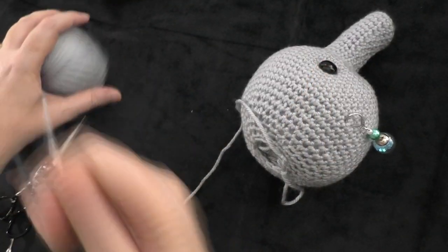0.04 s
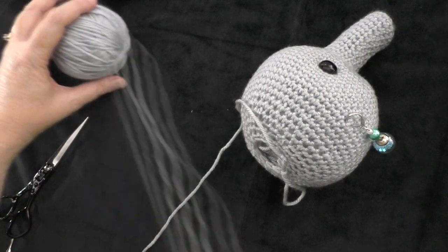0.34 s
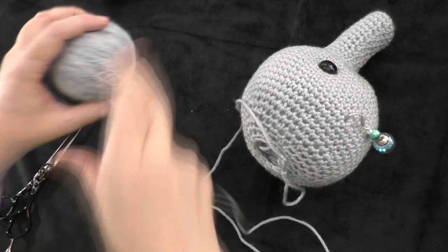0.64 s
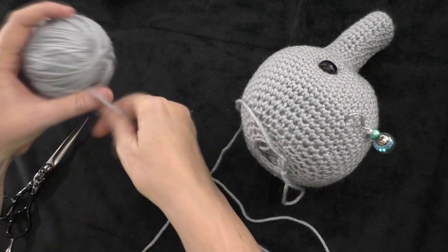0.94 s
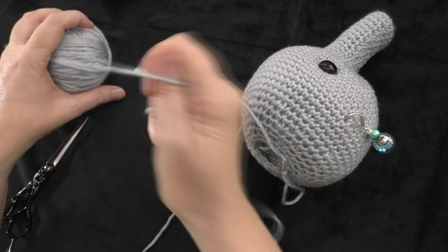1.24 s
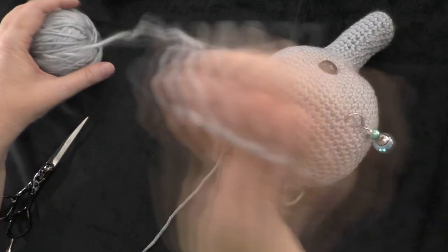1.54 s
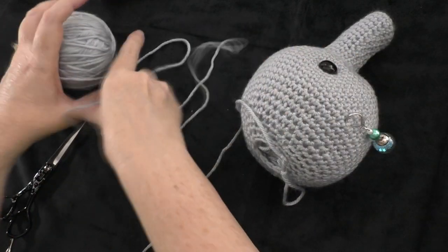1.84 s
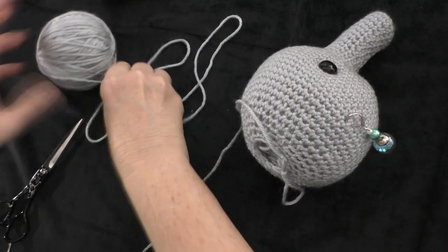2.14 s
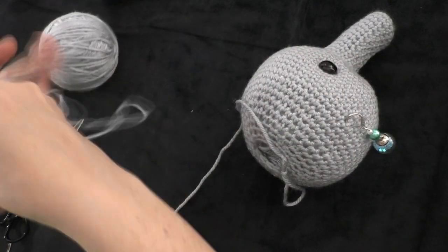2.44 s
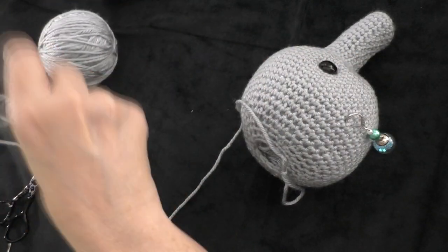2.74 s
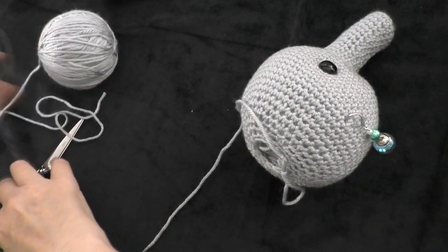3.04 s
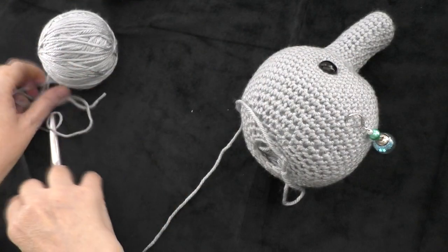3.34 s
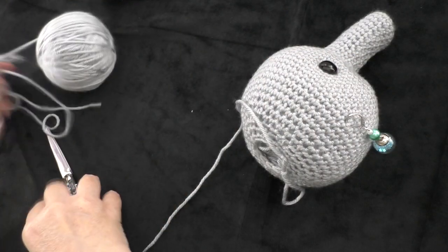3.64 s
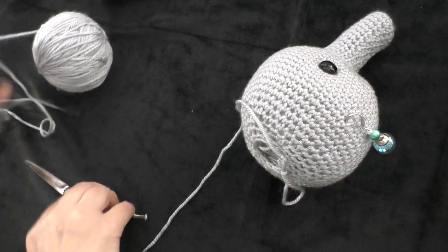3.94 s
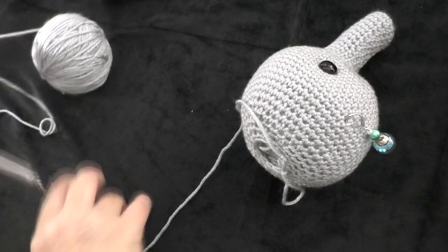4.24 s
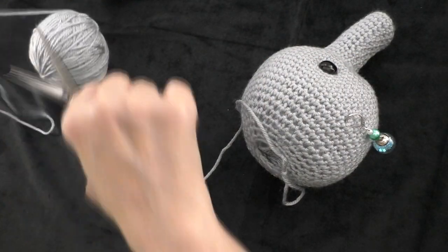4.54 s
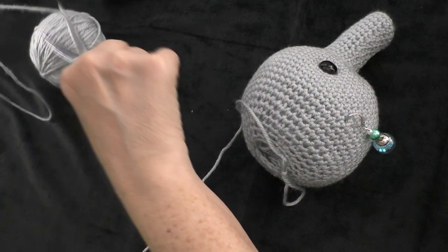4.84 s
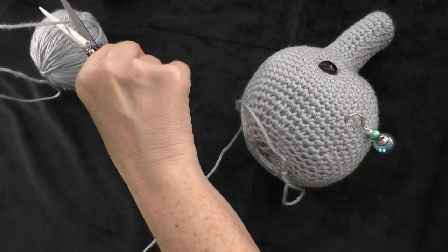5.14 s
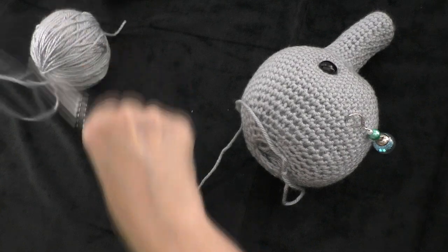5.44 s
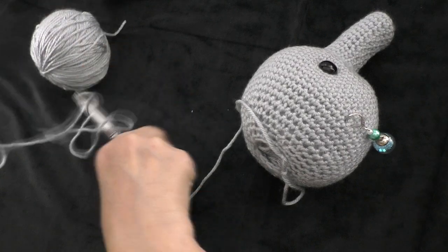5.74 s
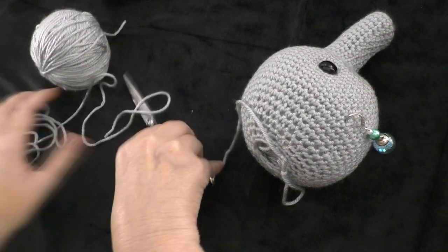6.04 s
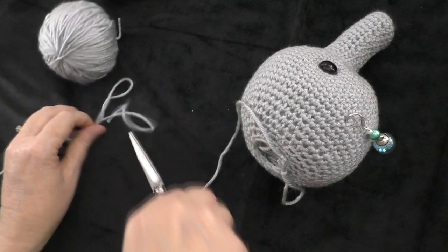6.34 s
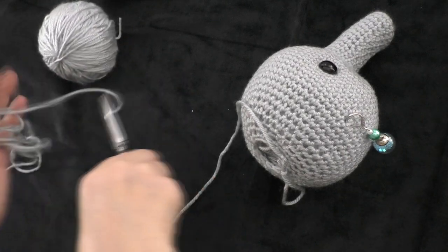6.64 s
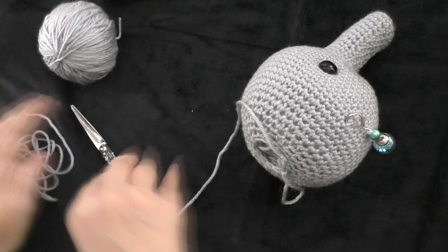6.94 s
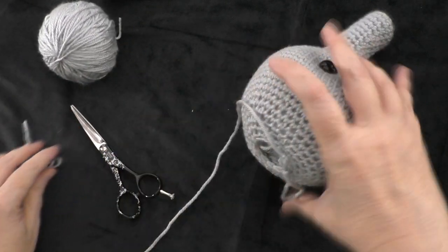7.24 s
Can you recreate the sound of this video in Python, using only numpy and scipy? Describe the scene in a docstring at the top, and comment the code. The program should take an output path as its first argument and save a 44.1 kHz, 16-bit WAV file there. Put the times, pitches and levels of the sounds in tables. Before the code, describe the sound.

Right at the start, steel scissors knock on a cloth-covered table with a dull thump, the strongest of the table knocks. Yarn rubs softly off a ball until about 1.5 seconds. Hands brush the cloth throughout and bump the table near 1.9 seconds. At 3.4 seconds the scissors give a sharp click with a soft thud, then light clinks and a short scrape up to 3.9. They snip lightly at 4.5 seconds and more sharply at 5.3. Another knock comes at 6 seconds. Around 6.9 the scissors clatter down with a low table rumble, then scrape faintly at 7.3. Underneath runs a faint low hum with thin hiss and an appliance buzz, which dips from about 4.5 to 6.2 seconds. The room is small and fairly dry, the stereo microphone close, with table and scissors slightly left.

```python
"""Yarn is pulled and cut at a cloth-covered table in a small, humming room, close to a stereo microphone.
First steel scissors knock on the table top and yarn rubs off the ball; hands bump, brush and lean.
From about 3 s the scissors are in the hand: they clink, then snip near 4.5 s and 5.3 s, while the
raised hand shields the microphone from an appliance buzzing behind. Near 7 s they clatter down on
the table and scrape briefly over the cloth."""
import sys
import numpy as np
from scipy import signal
from scipy.fft import rfft, irfft, next_fast_len
from scipy.io import wavfile
from scipy.ndimage import map_coordinates

SR = 44100
rng = np.random.default_rng(int(sys.argv[2]) if len(sys.argv) > 2 else 0)


def generate_wav(sig):
    """Save sig (samples, or channels by samples) to the path in sys.argv[1] as 16-bit PCM at SR."""
    pcm = np.round(np.clip(np.atleast_2d(sig).T, -1, 1) * 32767).astype(np.int16)
    wavfile.write(sys.argv[1], SR, pcm)


N = 326781


def amp(db):
    """Decibels to gain."""
    return 10 ** (np.asarray(db) / 20)


def unit(x):
    """x at rms 1."""
    return x / np.sqrt(np.mean(x ** 2) + 1e-20)


def along(points, hz):
    """(Hz, value) points read on a log axis."""
    freqs, values = np.transpose(points)
    return np.interp(np.log(hz + 1), np.log(freqs + 1), values)


def clock(size):
    """Seconds for size samples."""
    return np.arange(size) / SR


def wobble(rate):
    """A smooth random curve, rate knots a second."""
    return map_coordinates(rng.standard_normal(int(N * rate / SR) + 4), [clock(N) * rate])


def swell(s, length):
    """A smooth rise and fall around s seconds."""
    return np.exp(-2 * ((clock(N) - s) / length) ** 2)


def filtered(x, response):
    """x times a response of frequency."""
    size = x.shape[-1]
    padded = next_fast_len(size + SR // 4)
    return irfft(rfft(x, padded) * response(np.fft.rfftfreq(padded, 1 / SR)), padded)[..., :size]


def noise(spectrum, size=N):
    """Coloured noise of rms 1."""
    return unit(filtered(rng.standard_normal(size), lambda hz: amp(along(spectrum, hz))))


def add(track, s, sound):
    """Lay a sound into the track at s seconds."""
    part = track[max(round(s * SR), 0):][:len(sound)]
    part += sound[:len(part)]


def ring(modes, detune, blur):
    """Damped modes of peak 1; each blow shifts them a little, and loose contact blurs their phase."""
    t, x = clock(SR // 3), 0
    for hz, db, t60 in modes:
        strength_db = db + rng.standard_normal()
        wander = np.cumsum(rng.standard_normal(len(t))) / np.sqrt(SR)
        shifted_hz = hz * (1 + detune * rng.standard_normal())
        x = x + amp(strength_db - 60 * t / t60) * np.sin(2 * np.pi * shifted_hz * t + blur * wander)
    return x / np.abs(x).max()


# The two sides of the microphone. Each row: frequency in Hz, left-right likeness from 0 to 1.
STEREO_LIKENESS = [(60, 0.29), (150, 0.48), (380, 0.88), (950, 0.69), (2380, 0.29), (5980, 0.68),
                   (15000, 0.44)]
def diffuse(spectrum):
    """Stereo noise of rms 1 that reaches the microphone from all around."""
    angle = lambda hz: np.arccos(np.clip(along(STEREO_LIKENESS, hz), -1, 1)) / 2
    mid = filtered(noise(spectrum), lambda hz: np.cos(angle(hz)))
    side = filtered(noise(spectrum), lambda hz: np.sin(angle(hz)))
    return unit(np.array([mid + side, mid - side]))


def steady_tones(lines, drift_rad=.2):
    """Steady tones whose phases barely wander."""
    x = 0
    for hz, db in lines:
        phase = 2 * np.pi * (hz * clock(N) + rng.random())
        x = x + amp(db) * np.sqrt(2) * np.sin(phase + drift_rad * wobble(3.14))
    return x


# Still air all around the microphone. Each row: frequency in Hz, relative density in dB.
AIR_SPECTRUM = [(22, -21), (55, -7), (95, -5), (150, -6.5), (270, -3), (350, -12.5), (490, -12),
                (600, -26.5), (790, -26), (1150, -16.5), (2400, -24.5), (4000, -29.5), (7000, -45.5),
                (15000, -29)]
# Low room drone, dead centre: a mains hum near 120 Hz with faint steady room resonances.
# Each row: frequency in Hz, rms level in dB.
DRONE_LINES = [(119.7, -59.5), (179.5, -71), (275, -70), (599.5, -83)]
def room_tone(air_db=-57):
    """Air and a low drone fill the small room throughout."""
    return amp(air_db) * diffuse(AIR_SPECTRUM) + steady_tones(DRONE_LINES)


# The buzz behind the table. Each row: frequency in Hz, rms level in dB before the hand's shadow.
BUZZ_LINES = [(1168, -80.5), (1828.3, -82), (1888.2, -85), (1948.1, -76.5), (2008, -84), (2367.5, -84)]
# The whir around it. Each row: frequency in Hz, relative density in dB.
WHIR_SPECTRUM = [(400, 10), (750, 5), (1150, 4.5), (1550, 0.5), (1950, 8), (2700, 5), (4000, -9.5),
                 (7000, -14)]
# The hand between appliance and microphone. Each row: time in seconds, gain in dB.
HAND_SHADOW = [(4.42, 2), (4.7, -9), (6.08, -6), (6.25, 3)]
def appliance(whir_db=-66):
    """An appliance buzzes and whirs, quieter while the raised hand shields the microphone."""
    shadow = amp(np.interp(clock(N), *np.transpose(HAND_SHADOW)))
    return shadow * (steady_tones(BUZZ_LINES) + amp(whir_db) * diffuse(WHIR_SPECTRUM))


# The microphone's own noise. Each row: frequency in Hz, relative density in dB.
HISS_SPECTRUM = [(3000, -40), (6000, -10.5), (9500, -1.5), (12000, -0.5), (15500, -2)]
def microphone_hiss(level_db=-70.2, width=0.23):
    """Faint steady hiss, partly unrelated between the channels."""
    mid, side = noise(HISS_SPECTRUM), width * noise(HISS_SPECTRUM)
    return amp(level_db) * unit(np.array([mid + side, mid - side]))


# Close up, yarn runs off the ball and hands brush the cloth; the scissors snap sharply near 3.4 s,
# then scrape twice over the cloth. Each row: middle in seconds, length in seconds, level in dB.
YARN_PULLS = [(.12, 0.37, -59.5), (.65, 0.73, -69), (1.32, 0.45, -62)]
HAND_STROKES = [(0.283, 0.043, -66.5), (0.977, 0.028, -64), (1.142, 0.14, -65.5), (1.943, 0.073, -66),
                (2.084, 0.076, -61), (2.455, .05, -66), (2.586, 0.093, -62), (2.808, 0.033, -64),
                (3.223, 0.023, -63), (3.391, .11, -57), (3.91, .15, -68), (5.74, 0.13, -68),
                (6.322, 0.16, -59.5), (7.172, 0.1, -60.5)]
SCISSOR_SNAP_AND_SCRAPES = [(3.3856, 0.0065, -42.5), (3.9, 0.034, -57), (7.307, 0.058, -61)]
# Their airy swish, low rub and scissor noise. Each row: frequency in Hz, relative density in dB.
SWISH_SPECTRUM = [(1500, -28), (4000, -5.5), (7000, -8.5), (9800, 1.5), (13000, -1.5), (15500, -5.5)]
RUB_SPECTRUM = [(200, -52), (700, -5.5), (1400, 0), (2800, -1.5), (4500, -16), (8000, -20)]
SCISSOR_SPECTRUM = [(900, -2), (2000, 6), (3400, 3), (4700, 1), (7000, -14), (12000, -14)]
def handling(pull_swish_db=-10.5, brush_rub_db=-4.5, grain_db=3, unsteady_db=0.5, speed_db=1):
    """Yarn rubs, hands swish, scissors snap and scrape; fibres add grain, uneven speed adds surges."""
    pull, brush, scissors = (sum(amp(db) * swell(s, length) for s, length, db in moves)
                             for moves in (YARN_PULLS, HAND_STROKES, SCISSOR_SNAP_AND_SCRAPES))
    fibres = unit(amp(grain_db * wobble(700) + unsteady_db * wobble(60) + speed_db * wobble(12)))
    swish = (brush + amp(pull_swish_db) * pull) * diffuse(SWISH_SPECTRUM)
    rub = (pull + amp(brush_rub_db) * brush) * diffuse(RUB_SPECTRUM)
    return fibres * (swish + rub + scissors * diffuse(SCISSOR_SPECTRUM))


# The table top, close by; the two fastest-dying modes are the local thump under the blow.
# Each row: frequency in Hz, relative level in dB, seconds to fall 60 dB.
TABLE_MODES = [(74.3, -23.5, 0.24), (112.8, -15, 0.29), (177.7, -3, 0.15), (239, -19, 0.26),
               (277.5, 2, 0.145), (312, 8, 0.038), (343.8, -8, 0.12), (407.4, -6, 0.096),
               (492, -7.5, 0.089), (540, -5, 0.013), (622, -5, 0.061), (710, -27, 0.11), (978, -11, 0.05),
               (1170, -9, 0.047), (1320, -17, 0.064), (1622, -3.5, 0.04)]
def table_boom(db, corner_hz, push_s=0.0017, lowest_hz=45):
    """The table top booms as the push builds; a soft contact reaches only its lowest modes."""
    radiation = signal.butter(2, lowest_hz, "high", fs=SR, output="sos")  # slow motion pushes no air
    cushion = signal.butter(2, min(corner_hz, SR / 4), fs=SR, output="sos")
    top = ring(TABLE_MODES, detune=0.0022, blur=0.6)
    push = 1 - np.exp(-clock(len(top)) / push_s)
    boom = signal.sosfilt(np.vstack([cushion, radiation]), top * push)
    return amp(db) * boom / np.abs(boom).max()


# Scissors hit the table near the microphone. Each row: start in seconds, table level in dB,
# contact corner in Hz, handle level in dB, blade level in dB, seconds until the blades meet.
SCISSOR_KNOCKS = [(0.0963, -16, 770, -29.5, -37, 0.0068), (3.3739, -30.5, 650, -54, -31.5, 0.0086),
                  (3.85, -33.5, 373, -44, -67, 0.0027), (6.0495, -21, 393, -23.5, -40, 0.00064),
                  (6.872, -28, 300, -64, -51, 0.0091), (6.895, -20.5, 730, -24, -30, 0.0041),
                  (6.9096, -22.5, 460, -16.5, -54, .0008), (6.94, -32.5, 496, -44, -41, 0.0013),
                  (7.288, -48.5, 290, -42, -56, .005)]
# Hands bump the same table. Each row: start in seconds, level in dB.
HAND_BUMPS = [(.139, -24.5), (1.916, -33.5), (2.125, -49), (3.395, -31)]
def table_knocks(lag_s=.0012, flesh_hz=283, usual_db=-34, db_per_octave=25):
    """The table gives way just after the handles touch; harder bumps of the hand are brighter."""
    track = np.zeros(N)
    for s, db, corner_hz, *_ in SCISSOR_KNOCKS:
        add(track, s + lag_s, table_boom(db, corner_hz))
    for s, db in HAND_BUMPS:
        corner_hz = flesh_hz * 2 ** ((db - usual_db) / db_per_octave)
        add(track, s, table_boom(db, corner_hz))
    return track


def held(s):
    """Whether the scissors are in the hand at s seconds."""
    return 2.8 < s < 6.89


def gripped(modes, s, decay_scale=0.27):
    """While the scissors are held, the fingers cut their bending modes short."""
    return [(hz, db, t60 * (decay_scale if held(s) and 3500 < hz < 8000 else 1)) for hz, db, t60 in modes]


# The handles, close up. Each row: frequency in Hz, relative level in dB, free seconds to fall 60 dB.
HANDLE_MODES = [(1037, -4, 0.056), (1295, 2, 0.028), (1540, -4.5, 0.035), (2233, -2, 0.017),
                (2760, -3.5, 0.025), (2970, 12.5, 0.0042), (3840, -10, 0.07)]
def handle_clack(s, clack_db=-16, clack_t60=.018):
    """The jolted handles ring briefly over a dry burst of noise."""
    t = clock(SR // 3)
    ringing = ring(gripped(HANDLE_MODES, s), detune=0.0094, blur=19)
    return ringing + amp(clack_db - 60 * t / clack_t60) * noise(RUB_SPECTRUM, len(t))


# The blades, close up. Each row: frequency in Hz, relative level in dB, free seconds to fall 60 dB.
BLADE_MODES = [(4960, -18, 0.24), (5780, -9.5, 0.14), (6920, 1.5, 0.085), (7300, -6, 0.17),
               (9030, -3, 0.068), (9070, 2, 0.11), (8880, -11, 0.075), (10460, -2, 0.082),
               (11260, 0, 0.045), (12400, -7, 0.077), (13500, -6, .05), (14300, -10, .05),
               (15100, -9, 0.067)]
# The crack where they touch. Each row: frequency in Hz, relative density in dB.
CRACK_SPECTRUM = [(800, 22.5), (2500, -11), (5000, 11.5), (10000, 23.5), (15500, -40)]
def blade_clink(s, crack_db=-7, crack_t60=0.02):
    """Steel on steel: a brief crack and the ring of the blades."""
    t = clock(SR // 3)
    ringing = ring(gripped(BLADE_MODES, s), detune=0.0064, blur=26.7)
    return ringing + amp(crack_db - 60 * t / crack_t60) * noise(CRACK_SPECTRUM, len(t))


# The blades meet in the hand, above the table.
# Each row: start in seconds, blade level in dB, handle level in dB.
HELD_CLINKS = [(3.689, -47, -43), (4.451, -52, -75), (4.472, -39, -69), (5.285, -41, -39),
               (5.3114, -33, -54), (5.3148, -44, -33)]
def scissor_rattle(contacts=3, contact_s=.0002):
    """Every jolt clacks the handles; then the blades meet and rebound, dying sooner in the hand."""
    track = np.zeros(N)
    attack = 1 - np.exp(-clock(SR // 3) / contact_s)
    jolts = [(s, blade_db, handle_db, lag) for s, _, _, handle_db, blade_db, lag in SCISSOR_KNOCKS]
    jolts += [(*row, 0) for row in HELD_CLINKS]
    for s, blade_db, handle_db, lag in jolts:
        add(track, s, amp(handle_db) * attack * handle_clack(s))
        gap_s, loss_db = (.0055, 6) if held(s) else (.0092, 2.7)  # per rebound
        for k in range(contacts):
            add(track, s + lag + k * gap_s, amp(blade_db - k * loss_db) * attack * blade_clink(s))
    return track


# The small room around the table. Each row: frequency in Hz, seconds to fall 60 dB.
ROOM_DECAY = [(80, 0.38), (300, 0.15), (1500, 0.14), (10000, 0.091)]
def wall_reflections(x, width, delay_s=0.0076):
    """The walls answer after a few milliseconds, the bass lasting longest."""
    hz, t, spectra = signal.stft(rng.standard_normal((2, SR // 2)), SR, nperseg=256)
    decay = amp(-60 * t / along(ROOM_DECAY, hz)[:, None])
    mid, side = signal.istft(spectra * decay, SR, nperseg=256)[1]
    tail = np.array([mid + width * side, mid - width * side])
    delayed = np.pad(x, (int(delay_s * SR), 0))
    return signal.fftconvolve(delayed[None], tail / np.linalg.norm(tail[0]), axes=1)[:, :N]


# A hand leans on the table near the microphone. Each row: middle in seconds, level in dB.
HAND_LEANS = [(.725, -59.5), (3.22, -49.5), (3.69, -50.5), (3.87, -47), (4.95, -53.5), (5.87, -51),
              (6.24, -51), (6.93, -39.5), (7.16, -51)]
def table_rumble(shift_s=0.052):
    """Shifting weight makes the table rumble around its lowest mode."""
    weight = sum(amp(db) * swell(s, shift_s) for s, db in HAND_LEANS)
    return weight * diffuse([(25, -38), (45, -9), (70, -0.5), (110, -10), (200, -27), (500, -54)])


# The blades slide, close to the microphone. Each row: start in seconds, length in seconds, level in dB.
BLADE_SLIDES = [(4.463, 0.041, -55.5), (5.2833, 0.011, -42), (5.299, 0.01, -42.5)]
# Their grating edges. Each row: frequency in Hz, relative density in dB.
SHEAR_SPECTRUM = [(300, -32), (1000, -1), (2300, 4.5), (4500, -10), (7500, -6), (9500, 5.5), (15000, 3.5)]
def snips(grain_db=3):
    """The edges grate on each other and part the yarn fibre by fibre."""
    pressure = np.zeros(N)
    for s, length, db in BLADE_SLIDES:
        add(pressure, s, amp(db) * signal.windows.tukey(int(length * SR), .5))
    return pressure * unit(noise(SHEAR_SPECTRUM) * amp(grain_db * wobble(1200)))


def scene():
    """Table and scissors are close and slightly left of the microphone, with the room behind."""
    table = table_knocks()
    steel = scissor_rattle() + snips()
    near = table * amp([[.6], [-.6]]) + steel * amp([[.8], [-.8]])
    walls = amp(-9.5) * wall_reflections(table, width=0.31)
    walls += amp(-10.0) * wall_reflections(steel, width=0.6)
    return near + walls + table_rumble() + handling() + appliance() + room_tone() + microphone_hiss()


def record(dry, top_hz=15850):
    """The recorder keeps nothing above its band limit."""
    return filtered(dry, lambda hz: hz < top_hz)


dry = scene()
out = record(dry)
generate_wav(out)
```